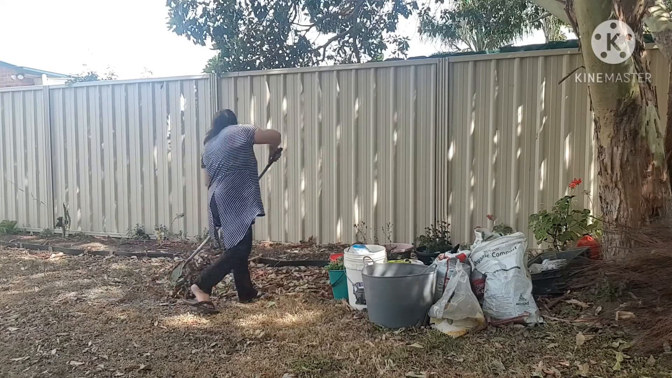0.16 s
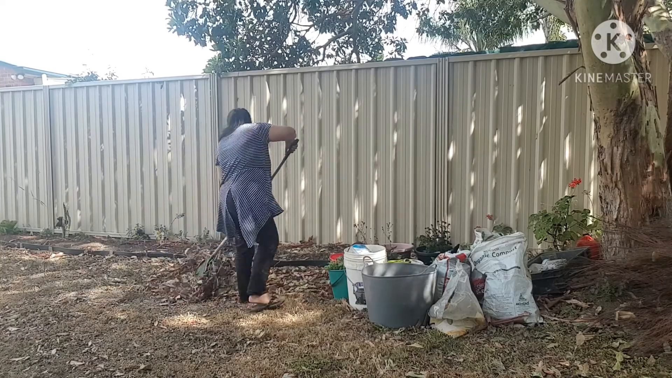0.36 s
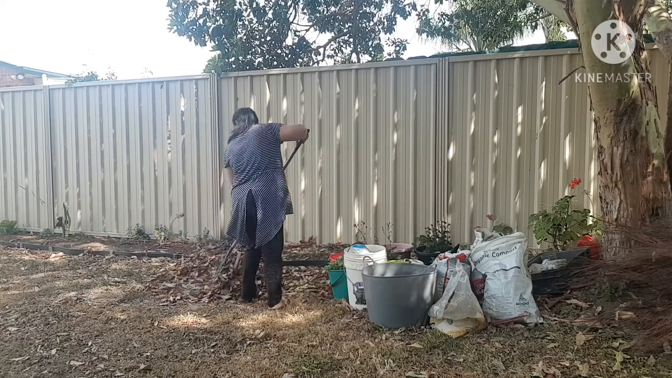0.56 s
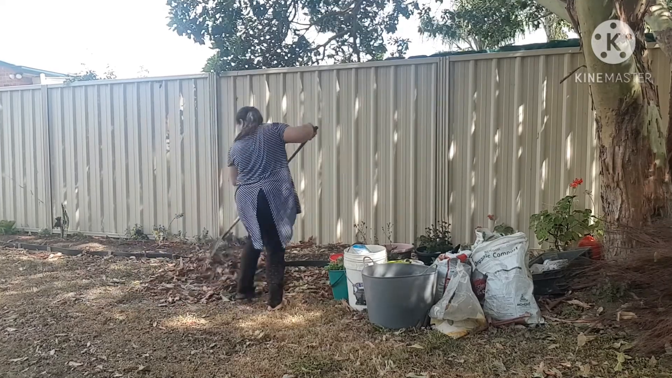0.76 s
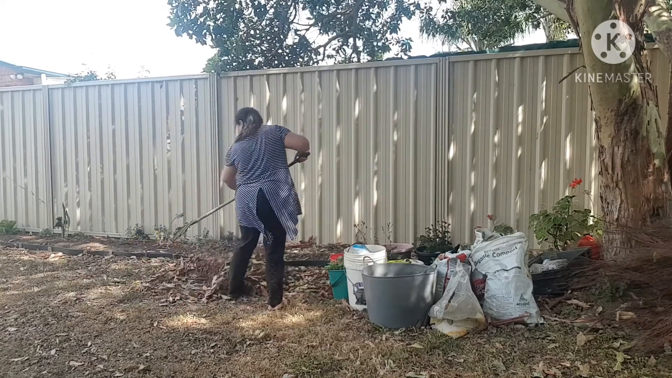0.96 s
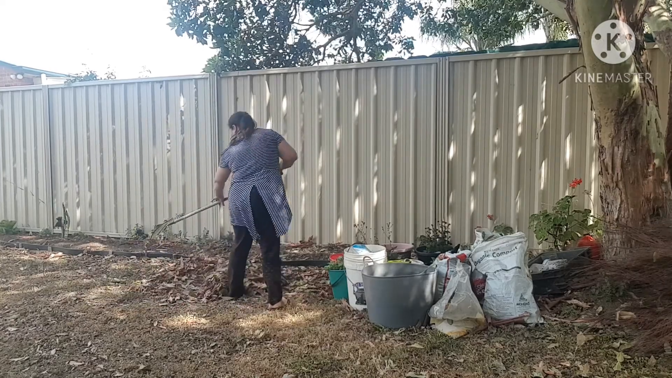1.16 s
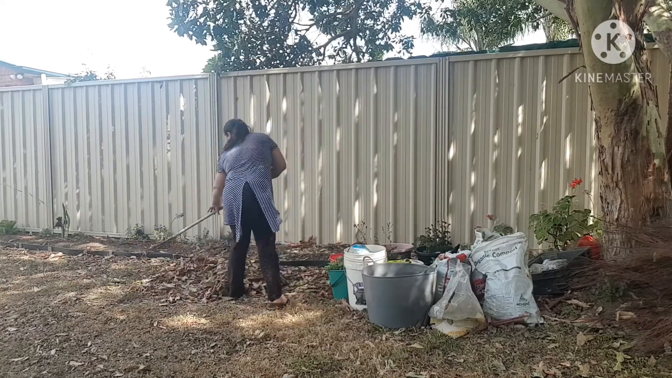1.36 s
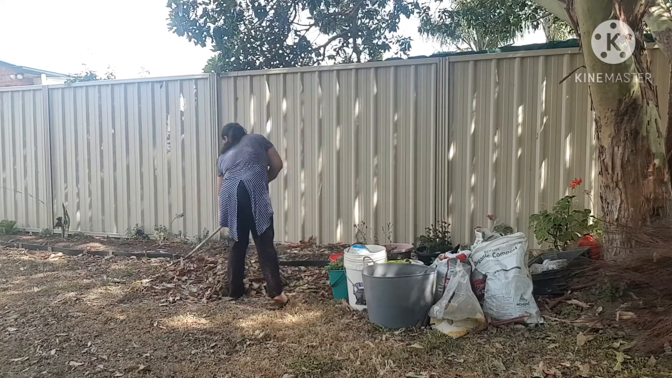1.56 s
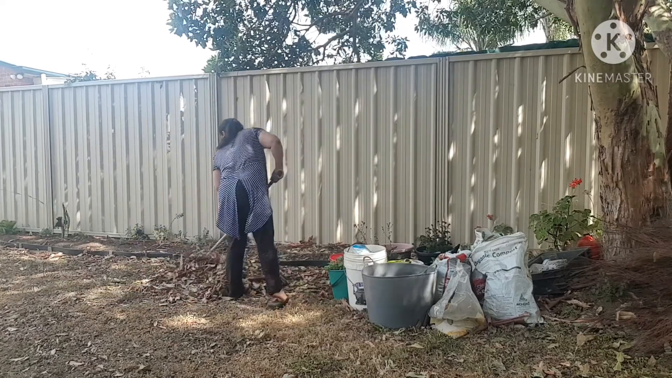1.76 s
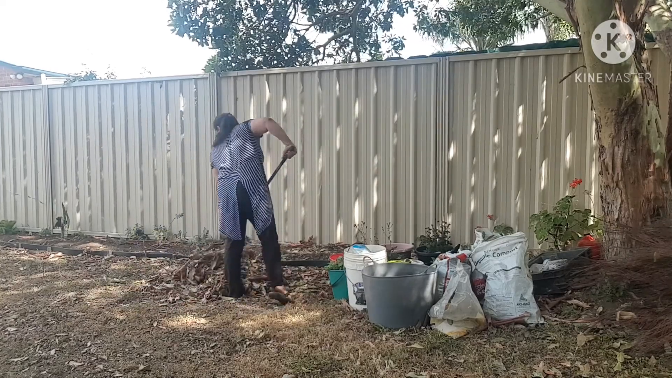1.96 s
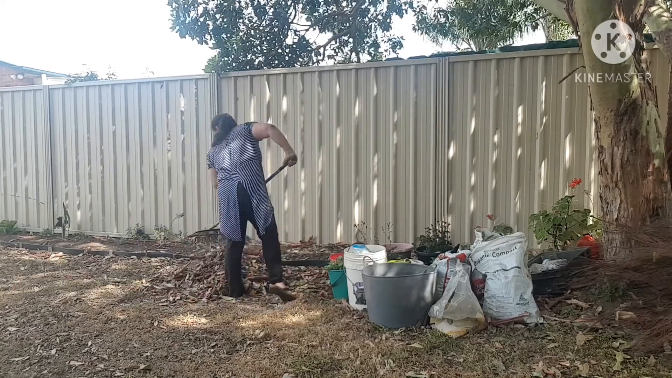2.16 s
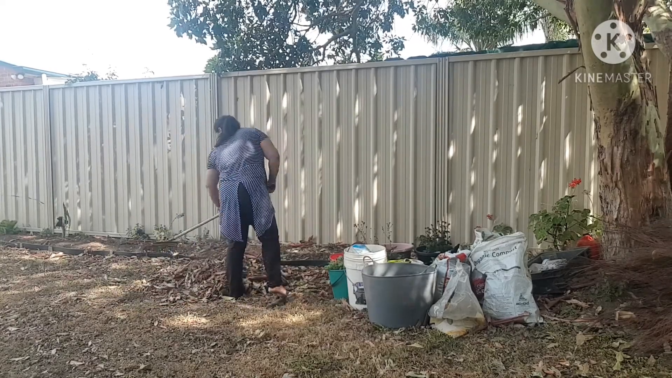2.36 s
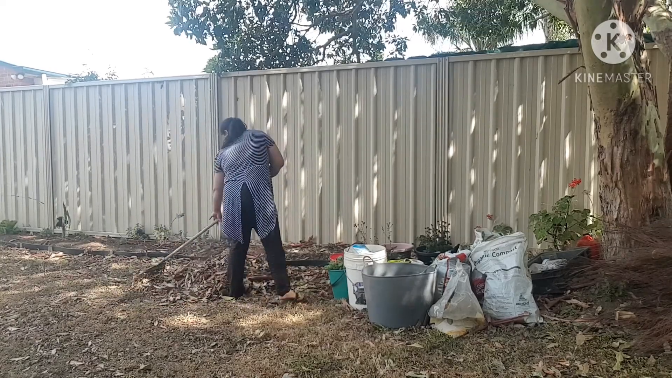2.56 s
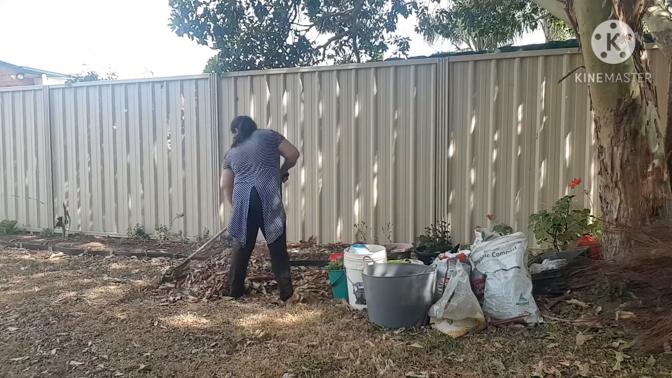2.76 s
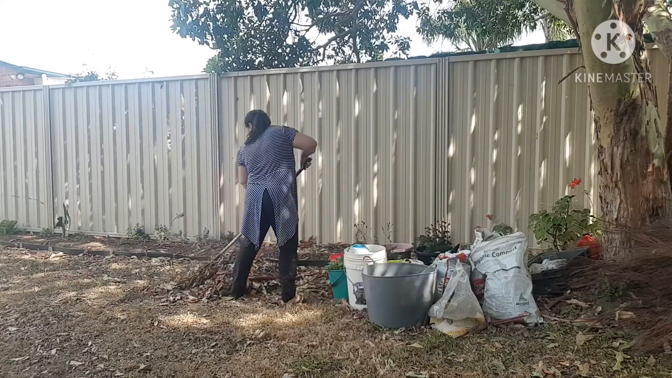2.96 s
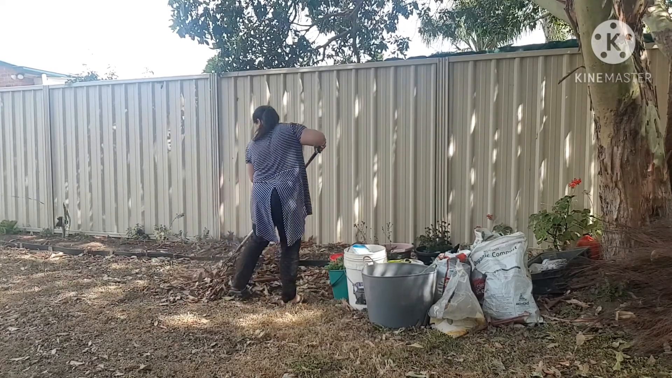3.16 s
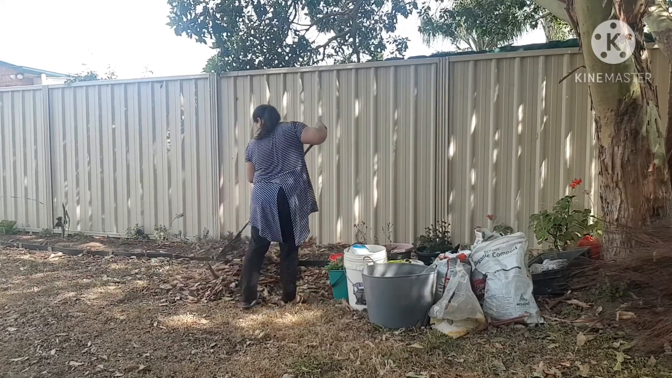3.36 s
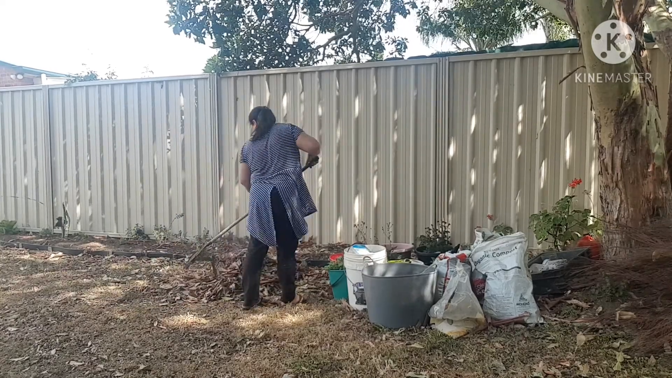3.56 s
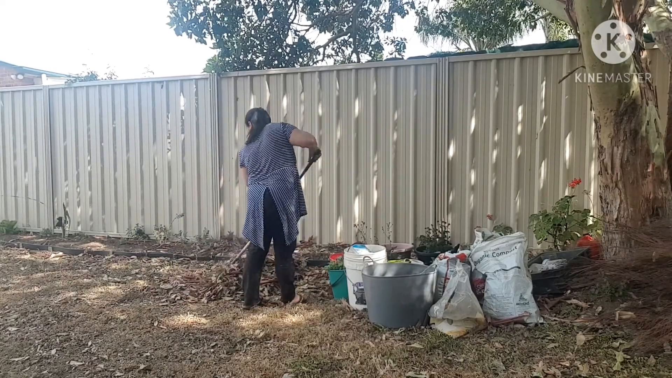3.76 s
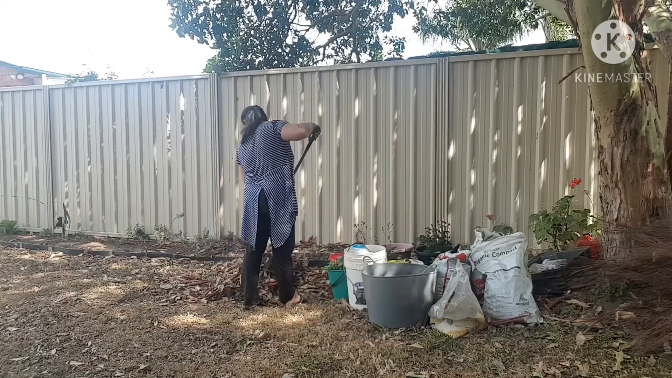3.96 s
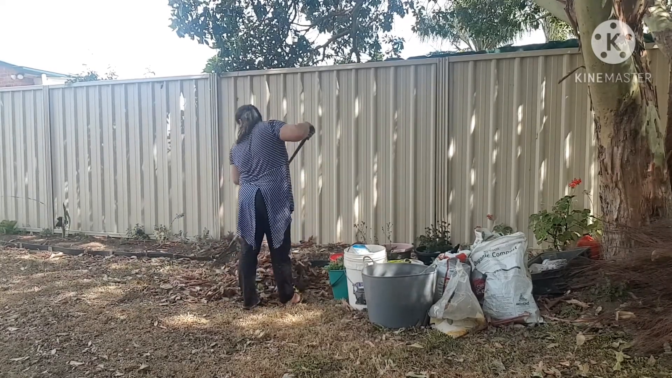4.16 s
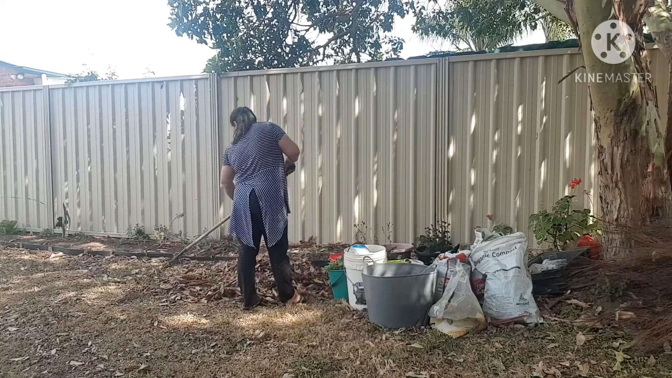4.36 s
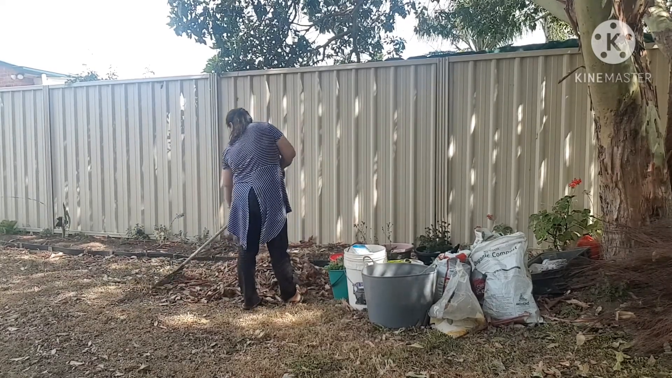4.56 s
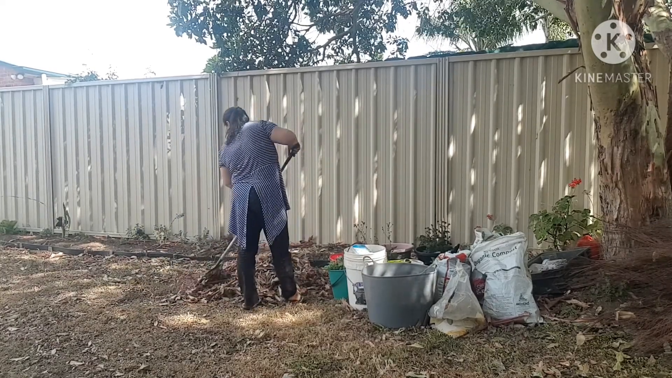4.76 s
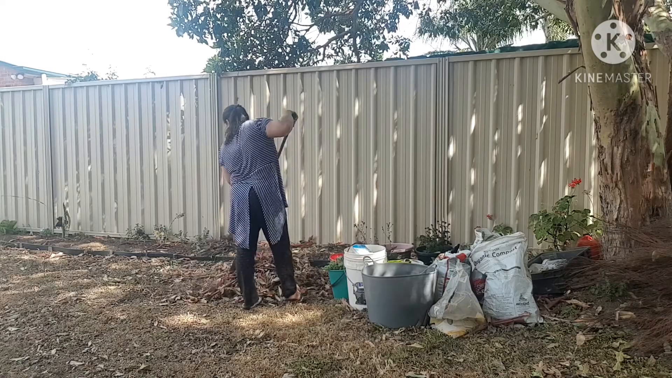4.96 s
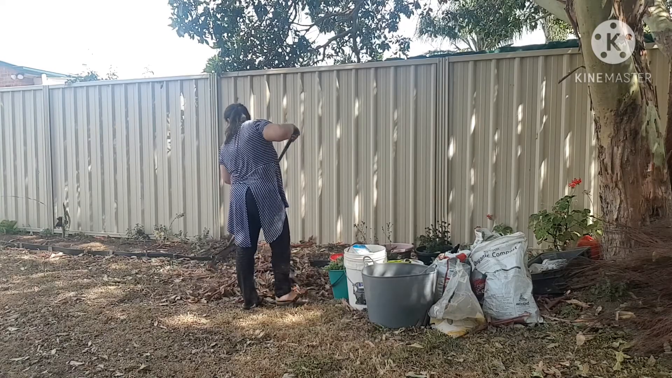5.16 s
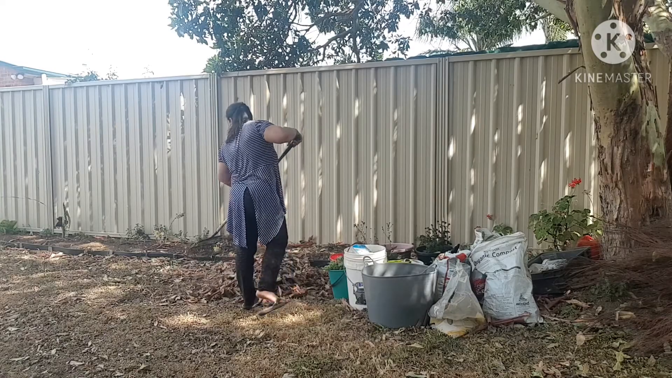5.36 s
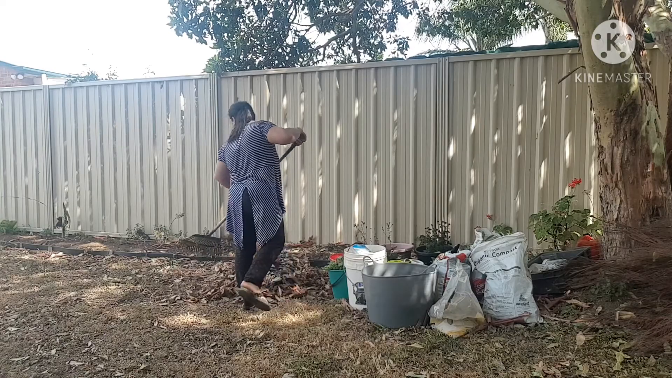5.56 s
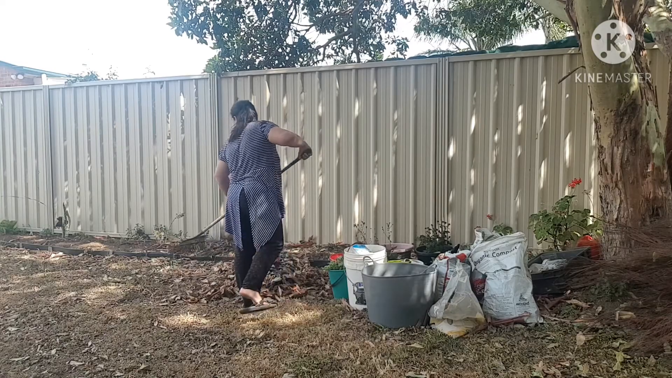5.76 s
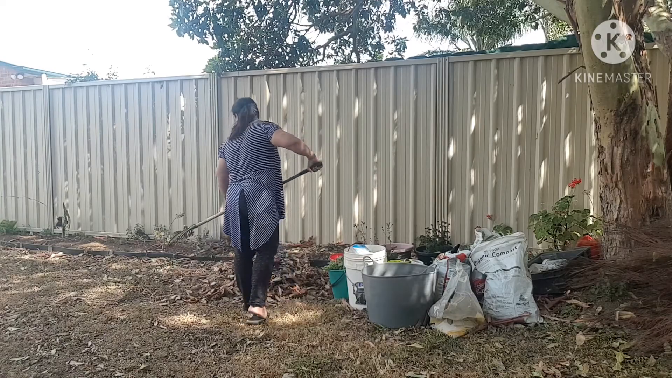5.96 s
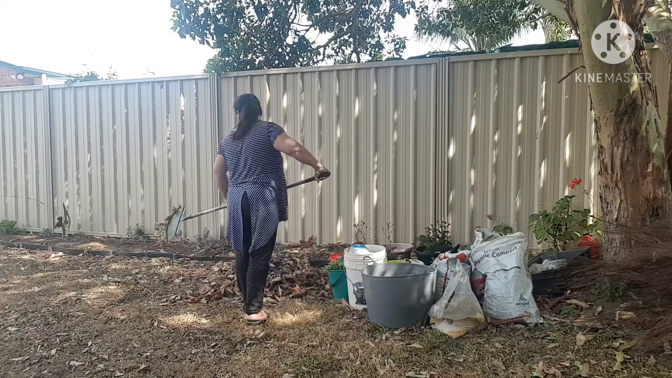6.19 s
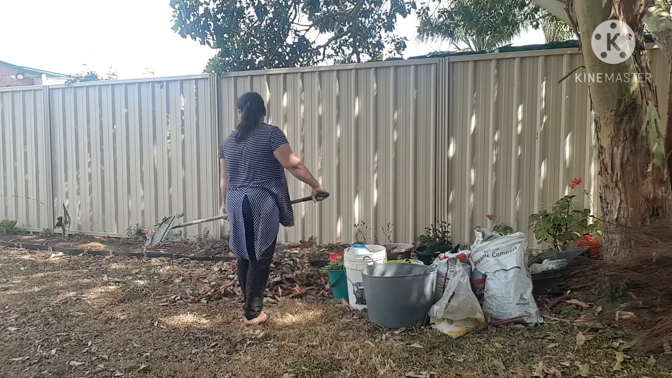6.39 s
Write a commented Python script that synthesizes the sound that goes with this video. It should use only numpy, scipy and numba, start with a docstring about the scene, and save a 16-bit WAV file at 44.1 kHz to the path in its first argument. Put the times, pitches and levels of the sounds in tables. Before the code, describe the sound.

In a fenced yard a few metres from a phone, a rake drags dry leaves over dirt in repeated strokes. Wind thumps hard on the microphone in the first second, then eases. Crushing, crackling leaves swell and sink, with sharp snaps and tine knocks as new strokes land. The last second is quiet, just faint settling rustles over a low hum and distant traffic.

```python
"""A fenced yard: a rake drags through dry leaves and dirt a few metres from a phone, a little to one side.
Showers of short damped grains make the tines scrape the soil and the leaves crush and crackle;
tight clusters of them make twigs snap and tines knock; the fence throws one scattered echo of the showers.
Gusts, as swinging low tones in turbulent noise, buffet the two microphone ports
over a low wavering hum of the wind and the coloured noise of far traffic."""
import sys
import numpy as np
from scipy import signal
from scipy.fft import rfft, irfft, next_fast_len
from scipy.io import wavfile
from scipy.ndimage import uniform_filter1d
from numba import njit

SR = 44100
rng = np.random.default_rng(int(sys.argv[2]) if len(sys.argv) > 2 else 0)


def linear_from_db(decibels):
    """Turn decibels (scalar or array-like) into linear amplitude factors; 0 gives 1."""
    return 10 ** (np.asarray(decibels, float) / 20)


def wav_out(sig):
    """Save sig, one row per channel (or a flat mono array), as 16-bit PCM at SR to the path in sys.argv[1]."""
    wavfile.write(sys.argv[1], SR, np.round(np.clip(np.atleast_2d(sig).T, -1, 1) * 32767).astype(np.int16))


N = 283330
T = np.arange(N) / SR
LAG_S, LAG_SPREAD_S = 8.5e-5, 1.2e-5  # left port hears later; the heap is wide


def unit(x):
    """Scale to rms 1."""
    return x / np.sqrt(np.mean(x ** 2))


def colour(x, points):
    """Weight the spectrum by (f/Hz, level/dB) points, joined along log frequency."""
    hz, db = np.transpose(points)
    size = next_fast_len(N)
    f = np.maximum(np.arange(size // 2 + 1) * SR / size, 1)
    gain = linear_from_db(np.interp(np.log(f), np.log(hz), db))
    return irfft(rfft(x, size) * gain, size)[..., :N]


def lowpass(x, hz):
    """Keep the bass, without shifting it in time."""
    return signal.sosfiltfilt(signal.butter(2, hz, fs=SR, output="sos"), x)


def walk(rate):
    """Random levels held 1 / rate s and slewed twice, at rms 1."""
    hold = int(SR / rate)
    steps = np.repeat(rng.standard_normal(N // hold + 1), hold)
    return unit(uniform_filter1d(uniform_filter1d(steps, hold), hold)[:N])


@njit
def ring(start, hz, cycles, size, n, sr):
    """Each grain is a damped swing that reaches each port at its own fractional moment."""
    out = np.zeros((2, n))
    for c in range(2):
        for k in range(len(hz)):
            s = (2j * np.pi - 1 / cycles[k]) * hz[k] / sr
            at = start[c, k] * sr
            i = int(at) + 1
            z, p = size[k] * np.exp(s * (i - at)), np.exp(s)
            for j in range(i, min(i + int(5 * cycles[k] * sr / hz[k]), n)):
                out[c, j] += z.imag
                z *= p
    return out


def grains(lo_hz, hi_hz, cycles, rate, scatter_db, lean=0 * T, scatter=1.1):
    """A shower of tiny breaks, scattered in time, pitch, size and place, each with one echo off the fence."""
    biggest = 2.3  # no grain strays further from the mean, in spreads
    fence_db, fence_t60_s = 0.3, .09
    fence_spread_s = 0.0002264  # echoes come from all along the fence
    count = int(rate * N / SR)
    when, pitch, place, late, aim = rng.random((120000, 5))[:count].T
    big, stiff = np.clip(rng.standard_normal((120000, 2))[:count].T, -biggest, biggest)
    # stiff pieces ring longer and purer, starting a little softer
    stretch = np.exp(scatter * stiff)
    size = linear_from_db(scatter_db * big) / stretch ** (1 / 3)
    s = when * (N - 1) / SR
    lag = LAG_S + LAG_SPREAD_S * (2 * place - 1)
    # lean above 0 crowds the pitches upward, below 0 downward
    crowded = pitch ** np.exp(-lean[(s * SR).astype(int)])
    hz = lo_hz * (hi_hz / lo_hz) ** crowded
    echo = s + .004 - fence_t60_s / np.log(1e6) * np.log(1 - late)
    echo_lag = fence_spread_s * (2 * aim - 1)
    start = np.hstack([[s + lag, s], [echo + echo_lag, echo]])
    sizes = np.append(size, size * linear_from_db(fence_db))
    return unit(ring(start, np.tile(hz, 2), np.tile(cycles * stretch, 2), sizes, N, 1. * SR))


# balance of traffic and tree hiss: f/Hz, relative level per Hz/dB
TOWN_COLOUR = [(88, 1.5), (150, -8), (361, -1), (601, 4.5), (941, 2), (1040, -4.5), (1940, -10),
               (2650, -17.5), (6000, -10.5), (9500, -12.5), (12000, -16), (14500, -16), (16000, -13)]


def town():
    """Far traffic and tree hiss: alike at both ports in the bass, unrelated in the treble."""
    town_db, split_hz = -46, 1100
    low_sway_db, high_sway_db = 2.5, 1.1  # bass and treble swell and sink separately
    mid, side = colour(rng.standard_normal((2, N)), TOWN_COLOUR)
    side = colour(side, [(250, -23), (450, -10.5), (800, -6.0), (1600, 2.0)])
    air = (mid + side * np.array([[1], [-1]])) / np.std(mid)
    low = lowpass(air, split_hz)
    swaying = low * linear_from_db(low_sway_db * walk(9)) + (air - low) * linear_from_db(high_sway_db * walk(6.8))
    return linear_from_db(town_db) * swaying


# slow level of the hum, before its quick waver: t/s, level/dB
HUM_LEVEL = [(0.0, -63), (0.57, -60), (1.05, -48), (1.36, -52.5), (1.86, -46), (2.22, -53.5), (2.47, -45.5),
             (2.91, -53), (3.02, -60), (3.27, -46), (3.48, -62), (4.3, -70), (4.85, -50.5), (5.18, -48.5),
             (5.4, -54), (5.6, -47), (5.78, -55.5), (6.42, -46)]


def hum():
    """A low hum of the wind, wavering in pitch and level."""
    pitch_hz, wander_hz, waver_db = 107.8, 4.99, 2.5  # the last two are rms
    s, db = np.transpose(HUM_LEVEL)
    phase = 2 * np.pi * np.cumsum(pitch_hz + wander_hz * walk(14)) / SR
    port_drift = np.array([[.35], [-.35]]) * walk(2.99)  # radians
    tone = np.sqrt(2) * np.sin(phase + port_drift)
    return tone * linear_from_db(np.interp(T, s, db) + waver_db * walk(22))


def eddies(points):
    """Turbulence of even strength, partly alike in both ports."""
    shared = 0.45
    both, left, right = rng.standard_normal((3, N))
    air = colour(shared * both + (1 - shared) * np.array([left, right]), points)
    return air / np.sqrt(uniform_filter1d(air ** 2, SR // 40))


# slow level of the breeze on the ports: t/s, level/dB
BREEZE_LEVEL = [(0.0, -37.5), (0.45, -45), (0.89, -44.5), (1.3, -50), (1.8, -48), (2.1, -56.5),
                (2.95, -52.5), (3.3, -49.5), (3.6, -54), (4.38, -58), (4.92, -51.5), (5.5, -51),
                (5.88, -50), (6.42, -51.5)]
# strong buffets, each a few swings of the port's air:
# t/s, left nominal level/dB, right nominal level/dB, length/s, f/Hz at the height of the buffet
BUFFETS = [(.02, -32, -36, 0.039, 232), (.066, -39, -35, .03, 130), (.095, -30, -30, .03, 110),
           (0.119, -18, -19.5, 0.033, 136), (0.169, -33, -29, 0.039, 124), (.224, -48, -35, .02, 126),
           (0.258, -30, -26, 0.035, 121), (.369, -34, -28.5, 0.039, 163), (0.402, -46, -26.5, 0.053, 144),
           (.47, -40, -27, 0.03, 135), (0.527, -44, -29, 0.017, 160), (0.637, -35, -36, 0.017, 139),
           (.655, -38, -27, .015, 283), (0.723, -30.5, -28, 0.054, 155), (.795, -36, -38, 0.038, 105),
           (0.85, -34, -28, 0.028, 149), (0.911, -38, -33, .03, 125), (1.029, -26, -27, 0.031, 128),
           (1.065, -37, -34, .02, 115), (1.606, -32, -34, .035, 132), (1.695, -39, -35, 0.084, 120),
           (1.74, -40, -37, 0.032, 85), (1.81, -37, -43, .04, 111), (1.855, -30.5, -35, 0.064, 116),
           (1.9, -34, -34, 0.046, 161), (1.951, -29, -33, 0.052, 97), (3.211, -43, -38, .03, 108),
           (3.281, -32, -33, 0.053, 85), (3.328, -38, -42, 0.041, 123), (3.391, -32, -36, 0.024, 109),
           (3.55, -45, -47, .035, 90), (3.618, -52, -45, .035, 132), (4.489, -48, -39, .035, 105),
           (4.662, -45, -42, .03, 121), (5.184, -32, -33, 0.036, 108), (5.554, -42, -37, .03, 130),
           (5.585, -35, -36, .04, 100), (5.605, -28.5, -33, .03, 150), (6.104, -44, -42, 0.055, 118),
           (6.303, -40, -36, .045, 115)]
# colour of the low rumble: f/Hz, level/dB
RUMBLE_COLOUR = [(25, -37), (60, -12.5), (105, -2), (160, -8.5), (260, -24), (500, -30)]
# colour of the higher flutter: f/Hz, level/dB
FLUTTER_COLOUR = [(60, -36), (140, 2.5), (220, 4), (400, -0.5), (700, -29), (1400, -30)]


def wind():
    """Buffets build up and break off over the breeze; a faster breeze flutters higher."""
    puffs_per_s, puff_over_breeze_db, puff_scatter_db, puff_s, puff_hz = 6, 9, 3, 0.02, 120
    swing_db, rough_db = -4, -13.5  # clean swing and turbulence, against the buffet's level
    slap_db, shove_db = -9.5, -8  # overtone of the swing; one-sided push under it
    bend = 0.097  # pitch rises across a buffet
    crest = .3  # phase of the swing at the height of the buffet, in turns
    port_slip = 1.1  # phase scatter between the ports, radians
    s, db = np.transpose(BREEZE_LEVEL)
    breeze_db = np.interp(T, s, db)
    gust = linear_from_db(breeze_db + np.array([4.1 * walk(24.82), 3.7 * walk(25.08)]))
    thump = np.zeros((2, N))

    # lesser puffs at random moments join the buffets
    count = int(puffs_per_s * N / SR)
    when = rng.random(100)[:count] * N / SR
    left, right, tone = rng.standard_normal((100, 3))[:count].T
    scatter = puff_scatter_db * np.array([left, right])
    level = np.interp(when, s, db) + puff_over_breeze_db + scatter
    puffs = zip(when, *level, puff_s + 0 * when, puff_hz * np.exp(0.21 * tone))
    rows = [*BUFFETS, *puffs]

    for (at, left_db, right_db, length, hz), (turn, slip) in zip(rows, rng.standard_normal((200, 2))):
        i = slice(max(int((at - .2) * SR), 0), int((at + .1) * SR))
        t = T[i] - at
        width = np.where(t < 0, 0.36 * length, 0.22 * length)  # builds slower than it breaks off
        swell = np.exp(-(t / width) ** 2) * linear_from_db(np.array([[left_db], [right_db]]))
        turns = hz * t * (1 + bend * np.tanh(t / length)) + crest + 0.15 * turn
        phase = 2 * np.pi * turns + port_slip * slip * np.array([[.5], [-.5]])
        shove = linear_from_db(shove_db) * np.array([[1], [np.cos(np.pi * slip)]])
        swing = np.sin(phase) + linear_from_db(slap_db) * np.sin(2 * phase) + shove
        thump[:, i] += swell * linear_from_db(swing_db) * swing
        gust[:, i] += swell * linear_from_db(rough_db)

    flutter_db = -5.0 + 0.65 * (breeze_db + 44.0) + 3.1 * walk(6.1)
    return thump + gust * (eddies(RUMBLE_COLOUR) + linear_from_db(flutter_db) * eddies(FLUTTER_COLOUR))


# brief dips of the bass in one port: t/s, length/s, port (0 left, 1 right)
BASS_DIPS = [(0.127, 0.041, 0), (0.273, 0.065, 0), (0.41, 0.061, 0), (0.589, 0.03, 0), (1.332, 0.05, 0),
             (1.624, 0.053, 0), (2.952, 0.155, 0), (3.447, 0.08, 1), (5.2, 0.05, 0), (5.418, 0.045, 0),
             (5.615, .03, 0), (5.615, .03, 1), (5.71, 0.13, 0)]


def dips(x):
    """Take the bass down for a moment, port by port, with short fades."""
    dip_db, dip_hz = -19, 434
    db = np.zeros((2, N))
    for at, length, port in BASS_DIPS:
        db[port, int(at * SR):int((at + length) * SR)] = dip_db
    return x - lowpass(x, dip_hz) * (1 - linear_from_db(uniform_filter1d(db, SR // 200)))


# knocks of the tines, then faint low rustles as the heap settles: t/s, nominal peak level/dB, f/Hz
KNOCKS_AND_RUSTLES = [(1.61, -21.5, 2720), (2.643, -32, 1050), (3.78, -19, 2760), (4.653, -30, 1040),
                      (4.997, -35, 1010), (5.368, -40, 895), (5.519, -41, 580), (5.846, -40, 904),
                      (6.01, -41, 620), (6.04, -45, 654), (6.296, -40, 608), (6.315, -40, 620)]


def knocks():
    """Each knock or rustle is a few damped swings near its pitch."""
    spread_s, cycles = 0.0061, 7.3  # cycles to fade by 1/e
    s, db, hz = np.repeat(KNOCKS_AND_RUSTLES, 4, axis=0).T
    delay, spread = rng.random((400, 2))[:len(s)].T
    s = s + spread_s * delay ** 2
    hz = hz * 1.11 ** (spread - .5)
    size = linear_from_db(db - 5.5 - 5.5 * delay)
    return ring(np.array([s + LAG_S, s]), hz, cycles + 0 * s, size, N, 1. * SR)


# single leaf and twig snaps: t/s, nominal peak level/dB before the ground colour, f/Hz
LEAF_SNAPS = [(1.2124, -19, 8650), (1.2614, -22, 14100), (1.2754, -25, 4130), (1.3513, -19.5, 14600),
              (1.3954, -28, 3350), (1.4074, -30, 3370), (1.4331, -22, 13900), (1.4426, -22, 10100),
              (1.5134, -28, 9150), (1.5224, -23, 13900), (1.5334, -24, 4700), (1.5778, -21, 9860),
              (2.6518, -12, 8970), (3.7584, -13, 10200), (3.7924, -11, 14500), (5.543, -33, 3500),
              (5.551, -32, 4000), (5.6418, -30, 14200), (5.9974, -34, 2180)]


def snaps():
    """Each snap is a millisecond cluster of broad breaks, half near its pitch, half anywhere."""
    # stray leaves tick at random over the crush
    strays_per_s, stray_over_crush_db, stray_scatter_db = 35, 12, 1.2
    snap_s = .0017
    when, big, tone = rng.random((1000, 3))[:int(strays_per_s * N / SR)].T
    at, crush_db = np.concatenate(RAKE_STROKES).T[:2]
    stray_db = np.interp(when * T[-1], at, crush_db) + stray_over_crush_db
    stray_db = stray_db - stray_scatter_db * np.log(1 - big)
    strays = np.array([when * T[-1], stray_db, 2500 * 5 ** tone]).T
    s, db, hz = np.repeat(np.vstack([LEAF_SNAPS, strays]), 16, axis=0).T
    delay, spread = rng.random((20000, 2))[:len(s)].T
    s = s + snap_s * -np.log(1 - .9 * delay)
    hz[::2] = 2500 + 13000 * spread[::2]
    hz[1::2] = np.minimum(hz[1::2] * 2 ** (spread[1::2] - .5), .36 * SR)
    size = linear_from_db(db - 5 - 9 * delay)
    return ring(np.array([s + LAG_S, s]), hz, np.full(len(s), 1.2), size, N, 1. * SR)


def slips():
    """Tines let go with a jolt that dies away: level jumps in dB at random moments."""
    slips_per_s, biggest_kick, fade_s = 45, 2.2, .009
    when, size = rng.random((1000, 2))[:int(slips_per_s * N / SR)].T
    kick = np.zeros(N)
    kick[(when * N).astype(int)] = biggest_kick * size
    jolt = signal.lfilter([1], [1, -np.exp(-1 / (fade_s * SR))], kick)
    return uniform_filter1d(jolt, SR // 700) - jolt.mean()


# stretches of raking, most starting as the rake lands; the last is the heap settling (before the ground colour):
# t/s, leaf crush level/dB, then over the crush: fine crackle level/dB, dig into the soil level/dB
RAKE_STROKES = [
    [(0, -40.5, 7.5, 1), (.1, -34.5, 1, -2.5), (.24, -34, 1.5, -2), (.36, -31.5, 2.5, -3.5),
     (.46, -32, 0.5, -1.5), (.55, -33.5, 0.5, 0), (.66, -35.5, 0.5, 0), (.78, -38.5, 1.5, -5),
     (.99, -35.5, 0.5, -3)],
    [(1.0, -38, 1, -3), (1.075, -33, 5, 0), (1.2, -38.5, 2.5, -6), (1.34, -44, -1.5, -9),
     (1.4, -50, 1, -10), (1.44, -42.5, 0, -18), (1.5, -50, 1, -9), (1.572, -52, 3, -2)],
    [(1.58, -51.5, 17.5, 0), (1.63, -44.5, 6.5, 2), (1.79, -31.5, -1, -4.5), (1.97, -33, 0.5, -3),
     (2.11, -41, 4.5, -7.5), (2.23, -43, 2.5, -9.5), (2.37, -41.5, 1, 0.5), (2.44, -45, 4, -1.5),
     (2.5, -44.5, 1.5, -10), (2.59, -45, 2, -4.5), (2.638, -49.5, 7.5, -2)],
    [(2.65, -48.5, 17.5, 5), (2.74, -44, 11, 6), (2.79, -40, 8, -5), (2.82, -33.5, 2, -4.5),
     (2.9, -32.5, 4.5, -2), (2.99, -32.5, 3.5, -4.5), (3.06, -30.5, -0.5, -2.5), (3.15, -33.5, 0.5, -1),
     (3.24, -35, -2.5, -3.5), (3.32, -37.5, 0, -0.5), (3.42, -41, 0.5, -8), (3.6, -40, 0.5, -7),
     (3.752, -39, 4, -7.5)],
    [(3.76, -40, 13, -2), (3.794, -28, 3, -5), (3.94, -35, -1.5, -2.5), (4.07, -35, -3.5, -3.5),
     (4.15, -37, -2.5, -4.5), (4.27, -33.5, -1.5, -10.5), (4.4, -36.5, -1.5, -8.5),
     (4.46, -39.5, 0.5, -9.5), (4.6, -44.5, 2, -6)],
    [(4.61, -48, 13.5, 5), (4.645, -43.5, 14.5, 6), (4.657, -39.5, 12, 6), (4.69, -38.5, 13.5, 3),
     (4.74, -35.5, 10, 1.5), (4.79, -33.5, 6.5, -2), (4.87, -34, 4.5, -4), (4.95, -35, 3.5, -1),
     (5.0, -38, 0, -10), (5.13, -46.5, 1, -4.5), (5.2, -44.5, -1, -26)],
    [(5.21, -47.5, 1, -5), (5.26, -42.5, -0.5, -14), (5.33, -45.5, 4, -5), (5.44, -47.5, 4.5, -5.5),
     (5.48, -49.5, 2.5, -10), (5.55, -53, 6, -1), (5.6, -57, 0, 1), (5.67, -53.5, 5.5, -1),
     (5.76, -55.5, 2, -6), (5.95, -58.5, -4, -6), (6.05, -55, 2, 4.5), (6.2, -61, 0, 2),
     (6.42, -64.5, 6, 4)],
]
# pitch the crackle leans to, a row per stretch:
# f/Hz as the stretch starts, f/Hz once the heap has gathered, time to gather/s
CRACKLE_LEAN = [(8730, 12200, 0.41), (12400, 12600, .2), (9840, 11350, 0.058), (8560, 12100, 0.29),
                (12150, 11200, 0.4), (9470, 12200, 0.14), (11550, 11400, 0.49)]
# grain kinds: lowest f/Hz, highest f/Hz, mid cycles to fade by 1/e, grains per s, size scatter level/dB
SOIL_GRAINS = (461, 1545, 1.65, 2500, 4.9)
TINE_GRAINS = (2013, 2910, 2.46, 3000, 5.5)
CRUSH_GRAINS = (3010, 8760, 1.5, 8000, 1.4)
CRACKLE_GRAINS = (8200, 14950, 0.74, 16000, 1.8)
# the tines spring free now and then and ring for a moment: a list of grain kinds, columns as above
SPRING_GRAINS = [(620, 1500, 18, 50, 3.5), (2058, 2950, 49, 60, 4.4)]
# sparse long-ringing grains, low ones follow the crush, high ones the crackle: columns as above
LOW_RING_GRAINS = (3200, 7500, 70, 130, 3)
HIGH_RING_GRAINS = (7500, 15200, 90, 200, 3.5)


def rake():
    """Tines catch and slip, so the scrape, crush and crackle surge together; each also flickers alone."""
    tines_over_soil_db, tines_follow_dig = 0.5, 0.76
    tine_ring_db, long_ring_db = -8, -9  # under the tine scrape; under the crush or crackle
    s, crush_db, fine_db, dig_db = np.concatenate(RAKE_STROKES).T
    crush, dig = np.interp(T, s, crush_db), np.interp(T, s, dig_db)
    soil, fine = crush + dig, crush + np.interp(T, s, fine_db)
    tines = crush + tines_follow_dig * dig + tines_over_soil_db

    # the crackle glides in pitch through each stretch
    starts = np.array([stretch[0][0] for stretch in RAKE_STROKES])
    k = np.maximum(np.searchsorted(starts, T, "right") - 1, 0)
    start_hz, end_hz, gather_s = np.array(CRACKLE_LEAN)[k].T
    fine_hz = end_hz + (start_hz - end_hz) * np.exp(-((T - starts[k]) / gather_s) ** 2)
    lean = 3.4 * np.log2(fine_hz / 11000)

    catch = 0.17 * walk(60) + 0.13 * walk(160) + slips()
    scrape = grains(*SOIL_GRAINS) * linear_from_db(soil + 0.9 * catch + 1.0 * walk(15))
    scrape += grains(*TINE_GRAINS) * linear_from_db(tines + 0.32 * catch + 1.8 * walk(70))
    springs = sum(grains(*kind, scatter=0.23) for kind in SPRING_GRAINS) * linear_from_db(tines + tine_ring_db)
    long_rings = grains(*LOW_RING_GRAINS, scatter=.3) * linear_from_db(crush + long_ring_db)
    long_rings += grains(*HIGH_RING_GRAINS, lean, scatter=0.28) * linear_from_db(fine + long_ring_db)
    crushing = grains(*CRUSH_GRAINS) * linear_from_db(crush + catch + 0.71 * walk(60))
    crackling = grains(*CRACKLE_GRAINS, lean) * linear_from_db(fine + 1.0 * catch + 0.92 * walk(55))
    return scrape + springs + long_rings + crushing + crackling


# colour of ground, air and microphone: f/Hz, level/dB
GROUND_COLOUR = [(60, -30), (250, -19.5), (450, -11), (1050, 0), (1400, 0), (1800, -0.5), (2200, -4.5),
                 (2750, 0.5), (4000, 2), (6000, 5.5), (8500, 4), (12000, -0.5), (14000, 4), (15500, 8.5)]


def scene():
    """Rake, snaps and knocks over wind, hum and town."""
    near = colour(rake() + snaps(), GROUND_COLOUR) * linear_from_db(2.5) + knocks()
    return dips(near + wind() + hum() + town())


def low_pass(x):
    """Removes everything above the highest recorded frequency."""
    return signal.sosfilt(signal.butter(12, 16000, fs=SR, output="sos"), x)


# colour difference of the ports: f/Hz, left minus right level/dB
PORT_COLOUR = [(100, -1.5), (300, 1.5), (700, 1.5), (2000, 0.5), (8000, -0.26)]
# pass band of the phone: f/Hz, level/dB
PASS_BAND = [(20, -14), (50, -5), (75, 0), (15650, 0), (15900, -40)]


def record(dry):
    """The two ports differ a little in colour; the phone cuts the extremes and adds a small offset."""
    offset = -.0016
    ports = []
    for x, side in zip(dry, (1, -1)):
        ports.append(colour(x, [(hz, side * db / 2) for hz, db in PORT_COLOUR]))
    mix = colour(np.array(ports), PASS_BAND) + offset
    return low_pass(mix)


dry = scene()
out = record(dry)
wav_out(out)
```